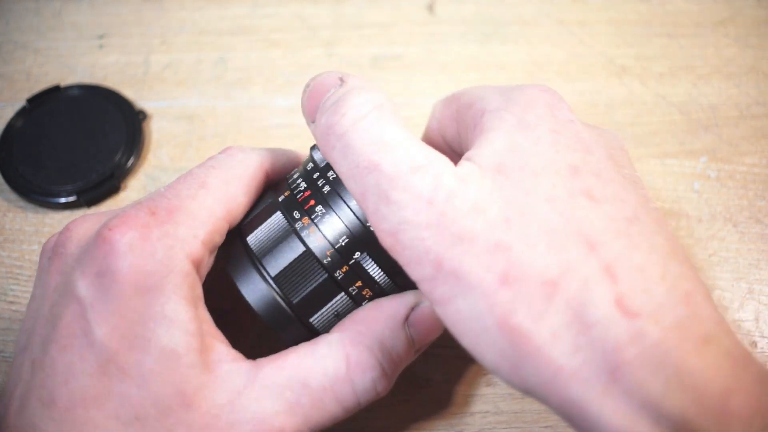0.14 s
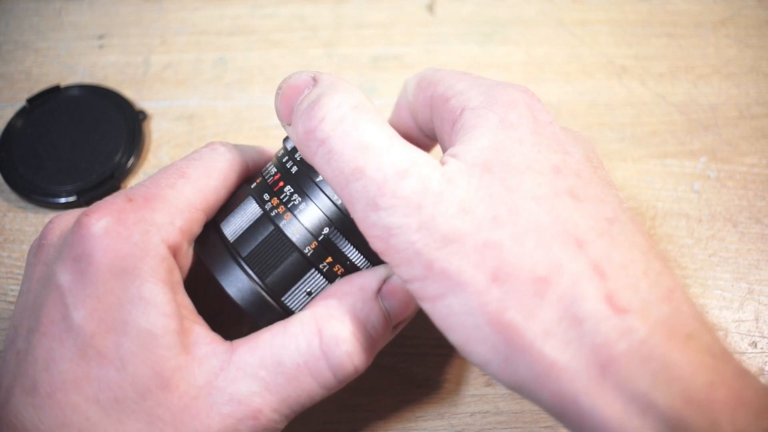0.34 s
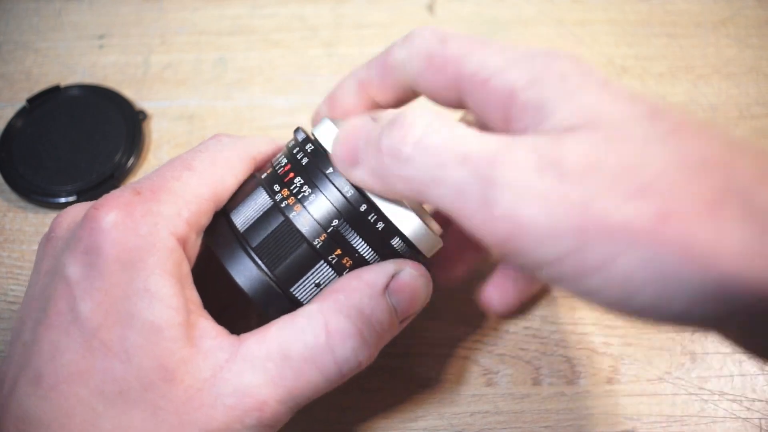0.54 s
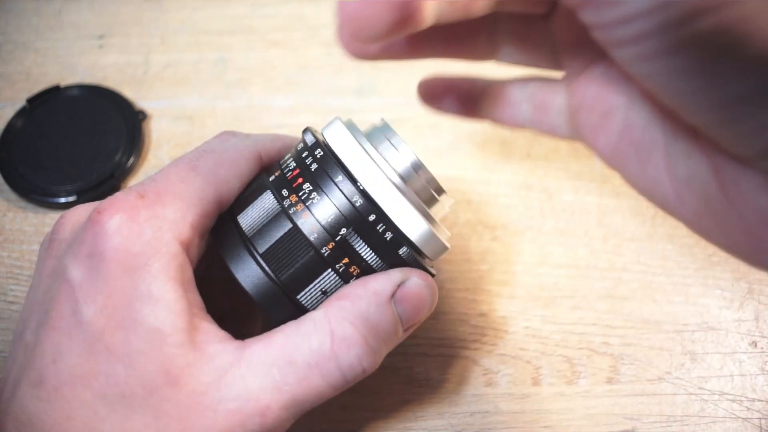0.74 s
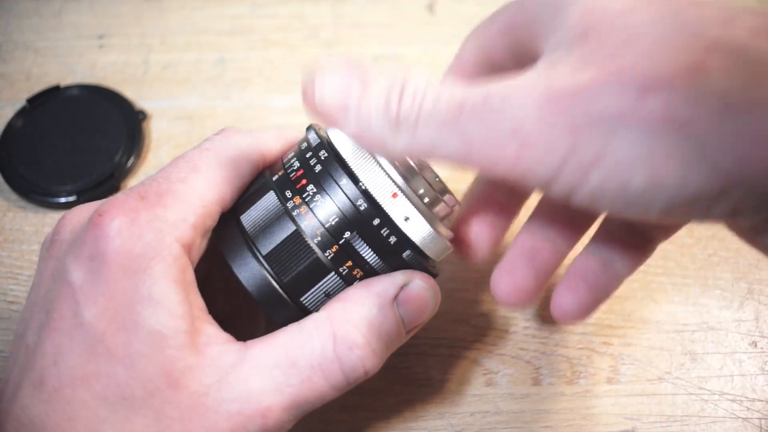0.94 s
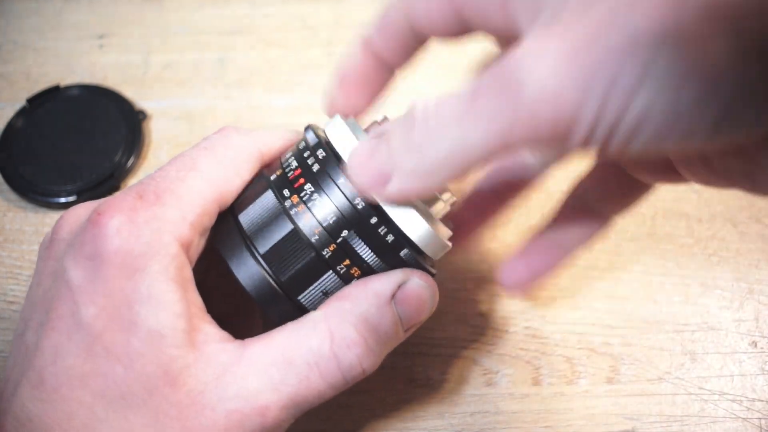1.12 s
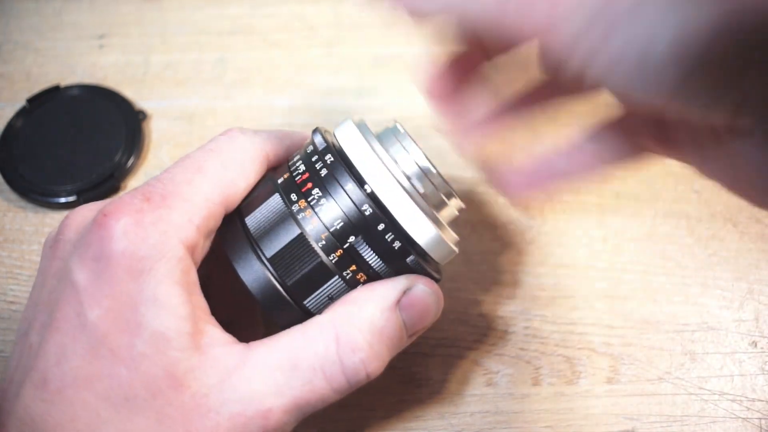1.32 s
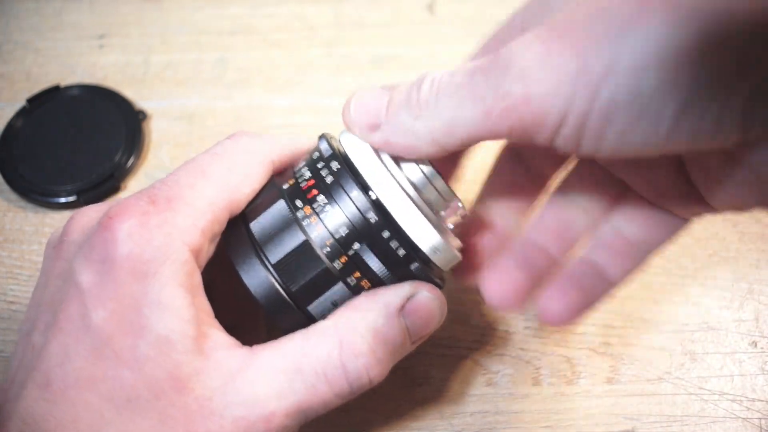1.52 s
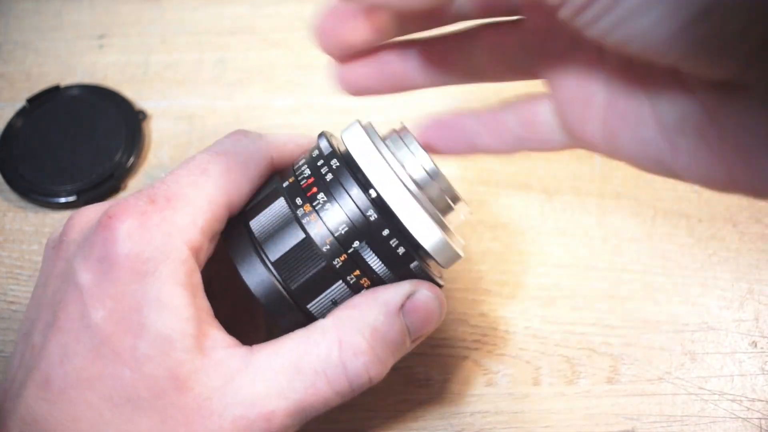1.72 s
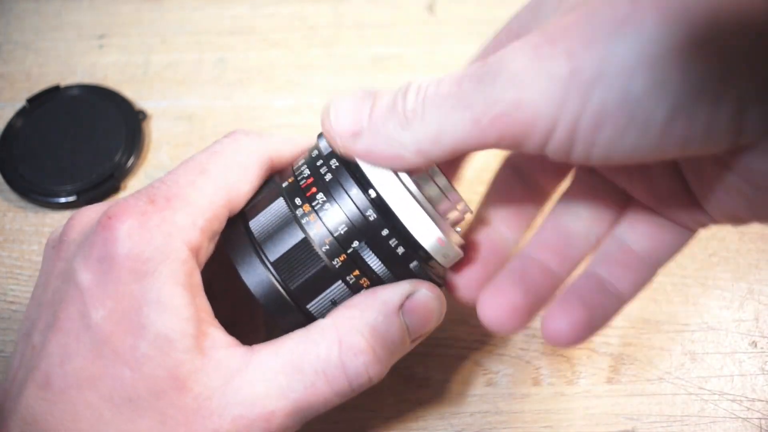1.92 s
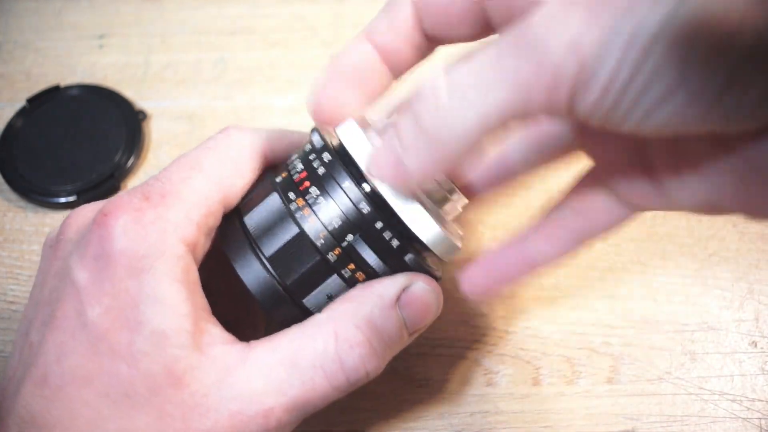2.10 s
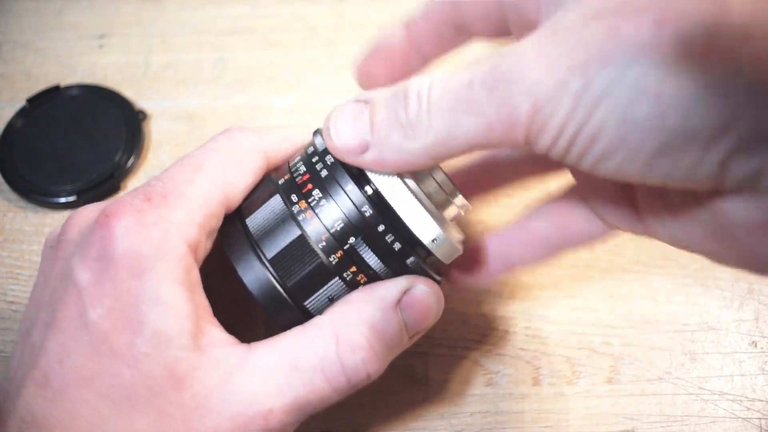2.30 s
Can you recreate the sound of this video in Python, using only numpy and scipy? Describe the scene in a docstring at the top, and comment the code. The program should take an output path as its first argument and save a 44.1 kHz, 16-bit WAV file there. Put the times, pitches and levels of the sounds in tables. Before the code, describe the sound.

Close up in a quiet room, fingers brush metal, then unscrew a lens ring in three or so bright, gritty spurts, with sharp clicks, small rattles and a few low handling thumps over faint hum and hiss.

```python
"""In a quiet room, a threaded metal mount ring is spun off a lens barrel by hand, close to a stereo microphone.
The thread scrapes in spurts (dense grit) and catches with dry clicks (sharp blows and a short rattle);
both ring the same barrel and ring modes, and short echoes follow.
Skin brushes the metal as shaped noise, a few short low thumps sound as struck resonances,
and a faint hum of wavering tones, a soft low rub and hiss lie under it all."""
import sys
import numpy as np
from scipy import signal
from scipy.fft import rfft, irfft
from scipy.io import wavfile

SR = 44100
rng = np.random.default_rng(int(sys.argv[2]) if len(sys.argv) > 2 else 0)


def generate_wav(signal):
    """Clip the signal to [-1, 1] and save it as 16-bit WAV at the path in sys.argv[1]."""
    frames = np.transpose(np.atleast_2d(signal))
    scaled = np.clip(frames, -1, 1) * 32767
    pcm = np.round(scaled).astype(np.int16)
    wavfile.write(sys.argv[1], SR, pcm)


def linear_from_db(decibels):
    """Turn decibels (scalar or array-like) into linear amplitude factors; 0 gives 1."""
    return 10 ** (np.asarray(decibels, float) / 20)


N = 108089


def rms_one(x):
    """Scale to rms 1."""
    return x / np.sqrt(np.mean(x ** 2) + 1e-20)


def in_time(rows):
    """Columns of a curve table, drawn as straight lines and read at every sample."""
    seconds, *columns = np.transpose(rows)
    return [np.interp(np.arange(N) / SR, seconds, column) for column in columns]


def at_hz(points, hz):
    """Read a spectrum table along log frequency."""
    table_hz, values = np.transpose(points)
    return np.interp(np.log(hz), np.log(table_hz), values)


def drift(rate_hz):
    """Random wander of spread 1: noise through two equal one-pole lowpasses."""
    r = np.exp(-2 * np.pi * rate_hz / SR)
    noise = rng.standard_normal(N + SR)
    settled = signal.lfilter([1], [1, -2 * r, r * r], noise)[SR:]
    return rms_one(settled)


def coloured(spectrum, white):
    """Noise shaped by a function of frequency that gives the gain."""
    hz = np.maximum(np.fft.rfftfreq(N, 1 / SR), 1)
    return irfft(rfft(white) * spectrum(hz), N)


def lean(db):
    """Gains left and right for a left-minus-right level."""
    return linear_from_db([[db / 2], [-db / 2]])


# The mode near 4.9 kHz shifts with the grip. Each row: time in seconds, pitch in Hz.
MODE_GLIDE = [(0, 5600), (.62, 5450), (.7, 5050), (.8, 4790), (.92, 5130), (1.15, 5070), (1.33, 4890),
              (1.46, 4950), (1.76, 4846), (2.1, 4840), (2.22, 4770), (2.45, 4880)]


def ring(force, hz, t60):
    r = linear_from_db(-60 / (t60 * SR))
    if hz is None:
        turn = np.exp(2j * np.pi * np.cumsum(in_time(MODE_GLIDE)[0]) / SR)
        envelope = signal.lfilter([1], [1, -r], force / turn + 1e-18)
        return np.imag(turn * envelope)
    w = 2 * np.pi * hz / SR
    return signal.lfilter([0, np.sin(w)], [1, -2 * r * np.cos(w), r * r], force + 1e-18)


def group(force, modes):
    """One force drives a group of modes, signs alternating."""
    out = 0
    for k, (hz, db, t60) in enumerate(modes):
        out = out + (-1) ** k * linear_from_db(db) * ring(force, hz, t60)
    return out


# Colour of the room noise. Each row: frequency in Hz, relative density in dB.
ROOM_COLOUR = [(20, -40), (40, -51), (55, -56.5), (90, -17), (130, -8), (200, -6.5), (320, -9.5),
               (450, -15.5), (668, -13), (959, -18), (1400, -19), (2000, -26.5), (2840, -26), (4820, -31),
               (9000, -35), (12100, -33), (15500, -37)]
# Stereo likeness of the room noise. Each row: frequency in Hz, left-right likeness from 0 to 1.
ROOM_LIKENESS = [(30, 0.41), (60, 0.2), (150, 0.3), (300, 0.044), (700, 0.1), (2000, 0.1), (8000, .1),
                 (16000, .05)]
# Balance of room and hum. Each row: frequency in Hz, left minus right in dB.
ROOM_LEAN = [(30, -8.5), (60, 6), (150, -1), (300, 1), (16000, 0.5)]
ROOM_DB = -51.5   # rms before the lean


def room():
    """Hiss and rumble: shared and opposed noise set how alike left and right are, most alike in the bass."""
    white = rng.standard_normal((2, N))

    def shape(hz):
        broad = linear_from_db(at_hz(ROOM_COLOUR, hz))
        return linear_from_db(ROOM_DB) * broad / np.sqrt(np.mean(broad ** 2))

    def alike(hz):
        return np.clip(at_hz(ROOM_LIKENESS, hz), 0, 1)

    def balance(hz):
        return linear_from_db(at_hz(ROOM_LEAN, hz) * np.array([[.5], [-.5]]))

    mid = coloured(lambda hz: shape(hz) * np.sqrt((1 + alike(hz)) / 2), white[0])
    side = coloured(lambda hz: shape(hz) * np.sqrt((1 - alike(hz)) / 2), white[1])
    return coloured(balance, np.array([mid + side, mid - side]))


# Each row: centre pitch in Hz, rms in dB before waver and lean, spread of the pitch waver in Hz.
HUM_TONES = [(28.6, -56.5, 2.04), (55.3, -61, 2.7), (152.4, -60.5, 4.8), (222.2, -61.5, 8.34),
             (292.3, -65.5, 3.88)]
HUM_WAVER_DB = 2.5


def hum():
    """Low sines that waver in pitch and level."""
    out = 0
    for hz, db, waver_hz in HUM_TONES:
        phase = 2 * np.pi * np.cumsum(hz + waver_hz * drift(6.15)) / SR
        level = np.sqrt(2) * linear_from_db(db + HUM_WAVER_DB * drift(6.8))
        out = out + level * np.sin(phase) * lean(at_hz(ROOM_LEAN, hz))
    return out


# A soft low rub of the hand. Each row: time in seconds, rms in dB.
LOW_RUB_LEVEL = [(0, -75), (.08, -71), (.14, -60), (.25, -61), (.35, -70), (.5, -80), (2.45, -90)]
LOW_RUB_HZ, LOW_RUB_T60_S = 650, 0.0081


def low_rub():
    """Soft noise in one low, heavily damped resonance."""
    noise = ring(rng.standard_normal(N), LOW_RUB_HZ, LOW_RUB_T60_S)
    return rms_one(noise) * linear_from_db(in_time(LOW_RUB_LEVEL)[0])


# Each row: start in seconds, level in dB before the lean, pitch in Hz, t60 in seconds.
THUMP_HITS = [(0.325, -32.5, 51.4, 0.11), (0.528, -36.5, 206, 0.06), (1.752, -24, 40, 0.091),
              (1.754, -34.5, 187, 0.045), (1.753, -28.5, 523, 0.0083), (2.009, -38, 760, 0.031),
              (.323, -42, 1000, 0.044)]


def thumps():
    """Short low thumps, some from handling, the deep one at 1.752 s from the loudest click
    overloading the recorder; each a struck resonance."""
    out = 0
    for start_s, db, hz, t60 in THUMP_HITS:
        force = np.zeros(N)
        force[int(start_s * SR)] = linear_from_db(db)
        out = out + ring(force, hz, t60)
    return out


# Skin sliding on metal. Each row: time in seconds, level in dB before flutter, width and lean.
SKIN_LEVEL = [(0, -59.5), (.05, -56), (.1, -60), (.16, -49), (.25, -59.5), (.31, -65), (.325, -34.5),
              (.345, -52.5), (.38, -53.5), (.43, -48), (.47, -54), (.5, -48.5), (.54, -39.5), (.58, -49.5),
              (.72, -42), (.9, -62), (1.04, -69), (1.07, -52), (1.11, -85), (1.14, -55), (1.17, -42.5),
              (1.26, -41.5), (1.45, -53.5), (1.58, -74), (1.7, -37.5), (1.9, -72), (2.05, -41), (2.2, -45),
              (2.45, -81)]
# Colour of the skin noise. Each row: frequency in Hz, relative density in dB.
SKIN_SPECTRUM = [(880, -55), (1500, -24), (1920, -19.5), (4850, -6), (5500, -10), (7520, -6), (9700, -7.5),
                 (10500, -10), (15500, -29)]
SKIN_SIDE_DB = -19.5   # side against mid
SKIN_FLUTTER_DB, SKIN_FLUTTER_HZ = 1.12, 30


def skin():
    """Bright soft friction noise, fluttering in level and spread a little wide."""
    white = rng.standard_normal((2, N))
    mid, side = coloured(lambda hz: linear_from_db(at_hz(SKIN_SPECTRUM, hz)), white)
    noise = rms_one(mid) + linear_from_db(SKIN_SIDE_DB) * rms_one(side) * [[1], [-1]]
    return noise * linear_from_db(in_time(SKIN_LEVEL)[0] + SKIN_FLUTTER_DB * drift(SKIN_FLUTTER_HZ))


# Modes of barrel and ring, in five groups: 1.3k, 3k, 4.9k, 7k, 12k.
# Each row: pitch in Hz (None is the gliding mode), relative level in dB, t60 in seconds.
BODY_MODES = [
    [(1000, -2.5, 0.012), (1301, -0.5, 0.024), (1547, 1, 0.014), (2008, -1.5, 0.0088)],
    [(2890, -1, 0.0087), (3280, 2.5, 0.008), (3795, 1, .008), (4320, -4, 0.009)],
    [(4290, -4.5, 0.019), (None, 0.89, 0.021), (5490, -7, 0.009)],
    [(5877, -1.5, 0.0076), (6370, -3, 0.0085), (6890, -3, 0.013), (7696, -4.5, 0.015), (8480, -7, 0.0067),
     (9500, -11, 0.0066)],
    [(10800, -5, 0.0034), (11260, -2.5, 0.0084), (11930, 2, 0.0074), (12100, -1, 0.004),
     (12730, -5.5, 0.0035)],
]
# The free ring, two close modes that beat. Each row: pitch in Hz, relative level in dB, t60 in seconds.
FREE_RING = [(10305, 0, .115), (10261, -4, .085)]
# Scraping of the thread. Each row: time in seconds, base level in dB,
# free ring against it in dB, 1.3k group against it in dB.
SCRAPE_LEVEL = [(0, -71, -8.5, -3), (.47, -69, -20, 2), (.6, -58.5, 10, 3), (.66, -47, -10, -4),
                (.72, -37, 0, -10.5), (.79, -39, -10.5, -5), (.87, -47, 9.5, 0.5), (.92, -58, 6, -2.5),
                (.95, -81, -2, 13), (1.12, -67.5, -2, 1.5), (1.14, -51.5, 5, -3.5), (1.2, -40, -11, -0.5),
                (1.27, -39.5, -2, -7.5), (1.34, -36.5, 1.5, -1), (1.38, -45.5, 5.5, -0.5),
                (1.44, -47, 0, 0.5), (1.49, -84, 15, 7), (1.58, -56.5, -4, -1), (1.62, -43, -7.5, -5.5),
                (1.72, -38.5, -9.5, -1.5), (1.75, -43, 14.5, -3.5), (1.78, -33, 4.5, -9.5),
                (1.85, -38, -2, -2), (1.9, -51, 8, -4.5), (1.94, -59, -20, 1), (1.96, -35, -26, -9),
                (1.99, -57, -12, 3), (2.02, -41, -14, -7.5), (2.07, -39, -9.5, -6), (2.14, -48.5, -6, -3.5),
                (2.19, -33, -1, -8), (2.23, -35, -8, -4.5), (2.265, -45, -21, -10), (2.3, -48, -4, -6),
                (2.345, -59, -4, 3), (2.37, -51.5, -16, -2), (2.41, -66, -8, -12), (2.45, -67, -4, 4)]
# The grip shifts the scrape between groups. Each row: time in seconds,
# then the 3k, 4.9k, 7k and 12k groups against the base level in dB.
GRIP_SHARES = [(0, -21, -5, -14, -4), (.6, -2, 4.5, 2, 7.5), (.72, -5.5, -5.5, -8.5, -4),
               (.78, -5, -0.5, -9.5, -6), (.86, -3.5, -1.5, -11, -0.5), (.92, -18, -4, -5, 1),
               (1.15, -6, -3, -1, -3), (1.27, -3, -0.5, -3, -0.5), (1.35, -3.5, -1.5, -2, -3.5),
               (1.46, -10, 4, -23, -1), (1.62, 0, -5, 1, -6.5), (1.72, -1, 0, -10.5, 0.5),
               (1.8, -5, -4.5, -8, -12), (1.85, 0, -0.5, -6.5, -3.5), (1.95, -4, -6, -12, -15),
               (2.08, -3, -10, -11, -6), (2.18, -4, -10, -10, -4), (2.25, -4, -6, -12, -12),
               (2.45, 0.5, 1, -2, -14)]
GRAINS_PER_S, GRAIN_SPREAD_DB = 5000, 1.5
JUDDER_DB, JUDDER_HZ = 1.8, 70
MODE_WANDER_DB, MODE_WANDER_HZ = 1.8, 22


def scrape():
    """Dense grit in the thread, juddering, drives every mode, each with a wandering strength."""
    level_db, ring_db, low_db = in_time(SCRAPE_LEVEL)
    grains = (rng.random(N) < GRAINS_PER_S / SR) * rng.choice([-1, 1], N)
    grain_db = GRAIN_SPREAD_DB * np.minimum(rng.exponential(1, N), 4)
    grains = rms_one(grains * linear_from_db(grain_db))
    push = linear_from_db(level_db + JUDDER_DB * drift(JUDDER_HZ))
    shares_db = (low_db, *in_time(GRIP_SHARES), ring_db)
    out = 0
    for modes, share_db in zip(BODY_MODES + [FREE_RING], shares_db):
        scale = np.std(group(grains, modes))   # brings each group to the same loudness first
        for m, mode in enumerate(modes):
            strength = linear_from_db(share_db + MODE_WANDER_DB * drift(MODE_WANDER_HZ))
            out = out + (-1) ** m * group(grains * push * strength, [mode]) / scale
    return out


# The thread catches. Each row: start in seconds, then the blow in dB on the 1.3k, 3k, 4.9k, 7k
# and 12k groups and on the free ring, before mode levels and chance.
CATCHES = [(0.321, -59, -57, -62, -35, -49, -50), (0.328, -46, -61, -53, -54, -46, -58),
           (0.332, -45.5, -57, -55, -42, -45, -51), (0.521, -45.5, -35, -58, -48, -54, -62),
           (0.535, -55, -60, -50, -34.5, -35, -36.5), (.655, -31.5, -36, -30, -33, -54, -54),
           (.735, -43, -46, -30.5, -35, -45, -50), (.746, -52, -53, -47, -32, -46, -51),
           (.768, -33, -28, -25.5, -29, -36, -37), (1.078, -43.5, -52, -56, -60, -76, -68),
           (1.202, -41, -46, -32, -31, -24, -32), (1.3112, -33, -20.5, -16.5, -26, -27, -28),
           (1.338, -49, -40, -23, -40, -40, -47), (1.3443, -40, -42, -26, -24.5, -35.5, -40),
           (1.416, -48, -48, -33.5, -31, -35, -40), (1.422, -55, -54, -34.5, -40, -40, -52),
           (1.5967, -29.5, -15.5, -15.5, -13.5, -13.5, -37), (1.599, -36, -31, -20, -18, -20, -33),
           (1.604, -36, -28, -44, -49, -38, -55), (1.752, -22, -3.5, -27, -14.5, -18.5, -8.5),
           (1.7576, -25.5, -16, -13, -17.5, -17.5, -45), (1.7823, -43, -44, -27, -29, -24, -60),
           (1.7994, -33, -39, -26, -29, -33, -60), (1.825, -46, -26, -32, -39, -44, -56),
           (1.848, -41, -31, -29.5, -31, -50, -43), (1.9465, -33.5, -22.5, -26, -21, -29.5, -40),
           (2.007, -34.5, -32, -35.5, -35, -40, -47), (2.046, -50, -41, -38, -40, -48, -58),
           (2.096, -33, -31, -31, -23.5, -49, -39), (2.101, -27.5, -17, -17.5, -15.5, -29, -44),
           (2.197, -34.5, -20.5, -28.5, -34, -28, -36), (2.207, -41, -36, -26, -29, -42, -47),
           (2.2129, -30.5, -21.5, -8, -11, -14, -40), (2.251, -37, -32, -39, -51, -55, -55),
           (2.272, -52, -23, -25.5, -31, -58, -59), (2.292, -48, -46, -40, -40, -50, -49),
           (2.296, -42.5, -38.5, -36, -43, -50, -57), (2.3564, -35.5, -24.5, -25.5, -28, -42, -50)]
# The ring damped by fingers, struck with the 12k group: pitch in Hz, relative level in dB, t60 in seconds.
DAMPED_RING = (10320, 0.81, 0.023)
RATTLE_DECAY_S, RATTLE_DB = .0016, -3.5
CLICK_SPREAD_DB = 3   # chance per catch and mode


def clicks():
    """Each catch is a sharp blow and short rattle on the damped modes, and a clean blow on the free ring."""
    rows = np.array(CATCHES)
    at = (rows[:, 0] * SR).astype(int)
    r = np.exp(-1 / (RATTLE_DECAY_S * SR))
    rattle = linear_from_db(RATTLE_DB) * rng.standard_normal(N)
    chance_db = CLICK_SPREAD_DB * rng.standard_normal((len(rows), 32))
    out = 0
    for k, modes in enumerate(BODY_MODES[:-1] + [BODY_MODES[-1] + [DAMPED_RING]]):
        for m, (hz, db, t60) in enumerate(modes):
            blow = np.zeros(N)
            blow[at] = linear_from_db(rows[:, 1 + k] + db + chance_db[:, 6 * k + m])
            rattle_level = signal.lfilter([np.sqrt(1 - r * r)], [1, -r], blow)
            force = blow + rattle_level * rattle
            out = out + (-1) ** m * ring(force, hz, t60)
    clean_blow = np.zeros(N)
    clean_blow[at] = linear_from_db(rows[:, -1])
    return out + group(clean_blow, FREE_RING)


ECHO_DB, ECHO_T60_S = -6, .055
ECHO_BRIGHTNESS = 0.44   # 0-1, treble tilt


def echoes(x):
    """Table and hands send back a short dense tail of decaying noise, another one on each side."""
    t = np.arange(int(.15 * SR)) / SR
    decay = linear_from_db(-60 * t / ECHO_T60_S) * (t > .0015)
    tail = rng.standard_normal((2, len(t))) * decay
    tail = signal.lfilter([1, -np.clip(ECHO_BRIGHTNESS, 0, 1)], [1], tail)
    tail = tail / np.sqrt(np.sum(tail ** 2, axis=1, keepdims=True))
    return linear_from_db(ECHO_DB) * signal.fftconvolve(x[None], tail, axes=1)[:, :N]


LENS_LOW_HZ, LENS_CUT_HZ = 740, 13340   # highpass and lowpass corners on clicks and scrape
LENS_LEAN_DB, THUMP_LEAN_DB = -1, -9    # left minus right


def scene():
    """Lens a little right of centre with its echoes, thumps further right, and the room."""
    lowpass = signal.butter(6, LENS_CUT_HZ, fs=SR, output="sos")
    highpass = signal.butter(4, LENS_LOW_HZ, "high", fs=SR, output="sos")
    lens = signal.sosfilt(lowpass, clicks() + scrape())
    lens = signal.sosfilt(highpass, lens)
    near = (lens + skin()) * lean(LENS_LEAN_DB) + echoes(lens)
    low = thumps() * lean(THUMP_LEAN_DB) + low_rub()
    return near + low + room() + hum()


def top_cut(x):
    """Nothing passes above the cut-off."""
    return signal.sosfilt(signal.butter(12, 15670, fs=SR, output="sos"), x)


CLIP_TOP = 1.7   # where the soft bend would level off, 1 is full scale


def record(dry):
    """Peaks bend softly, then stop hard at full scale."""
    bent = CLIP_TOP * np.tanh(dry / CLIP_TOP)
    mix = np.clip(bent, -1, 1)
    return top_cut(mix)


dry = scene()
out = record(dry)
generate_wav(out)
```